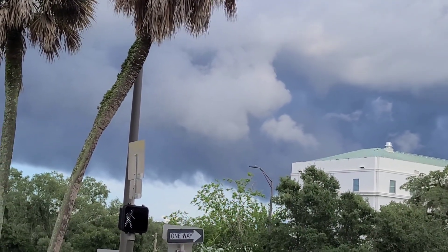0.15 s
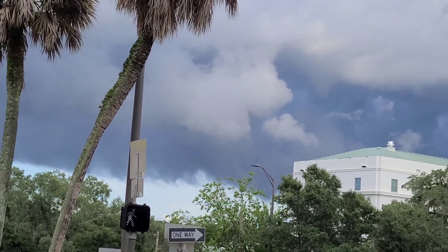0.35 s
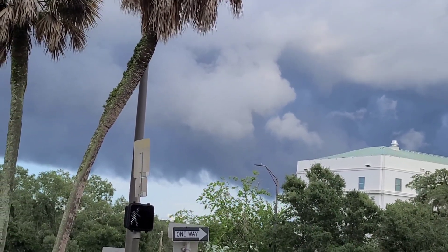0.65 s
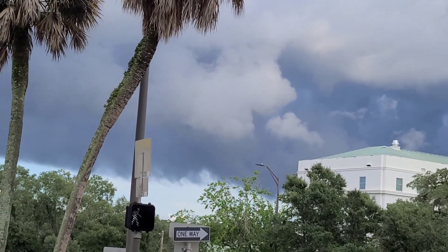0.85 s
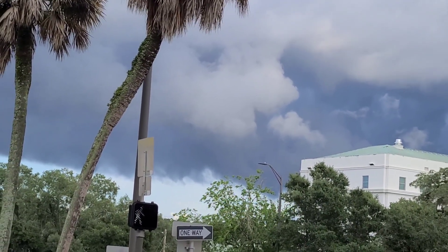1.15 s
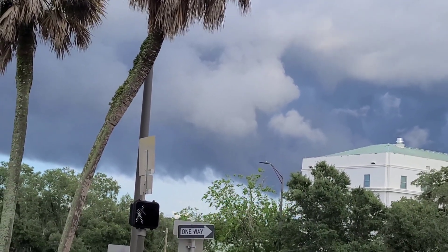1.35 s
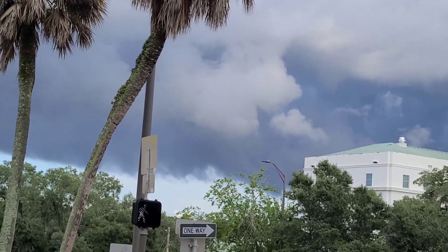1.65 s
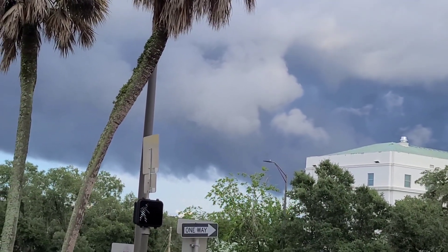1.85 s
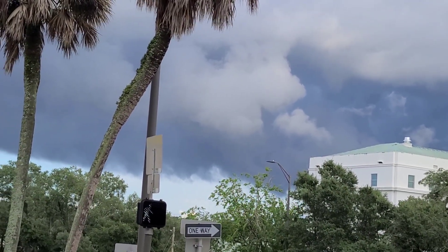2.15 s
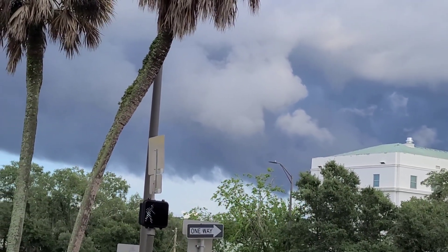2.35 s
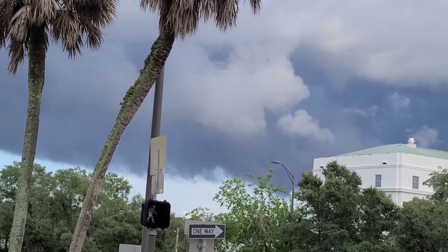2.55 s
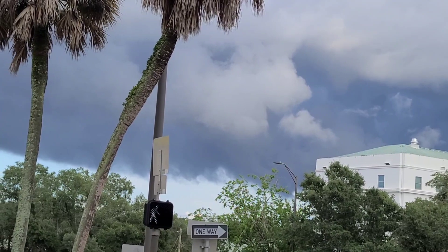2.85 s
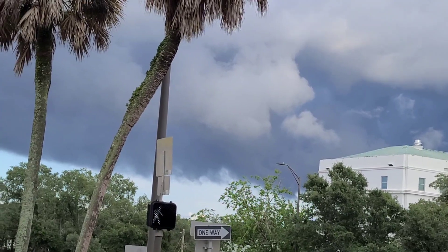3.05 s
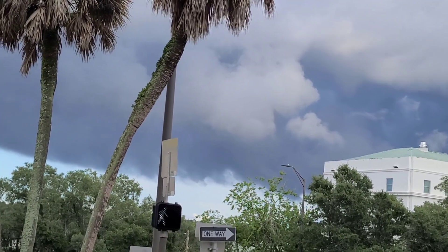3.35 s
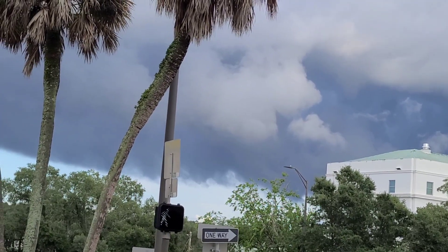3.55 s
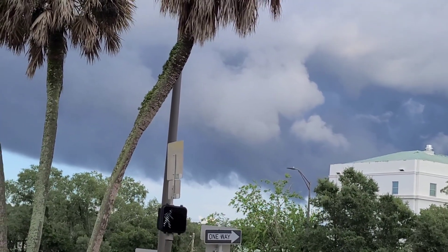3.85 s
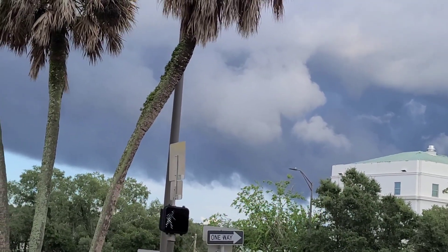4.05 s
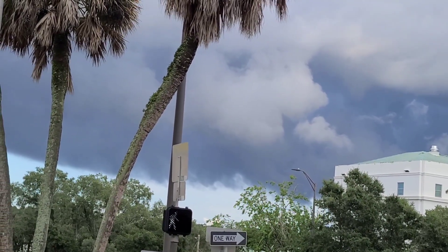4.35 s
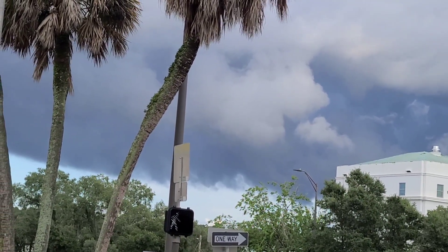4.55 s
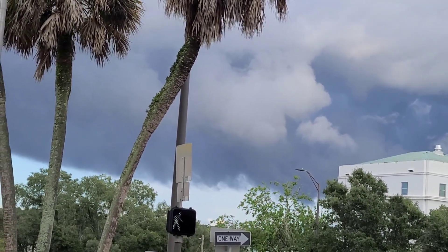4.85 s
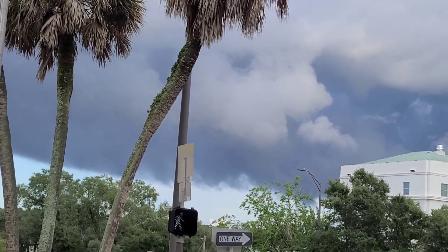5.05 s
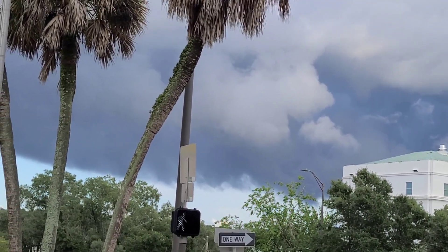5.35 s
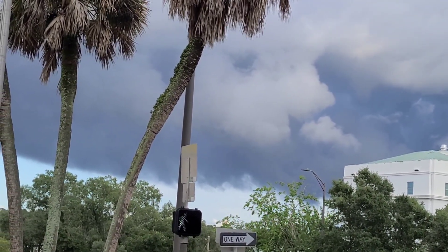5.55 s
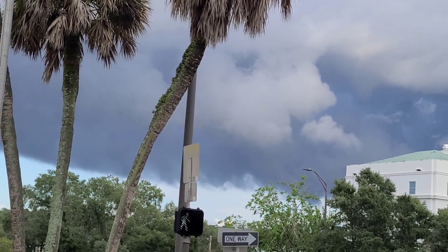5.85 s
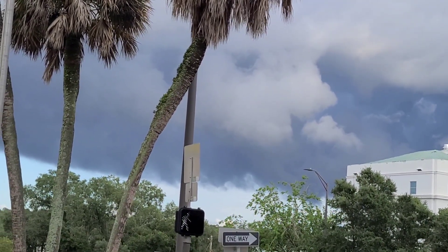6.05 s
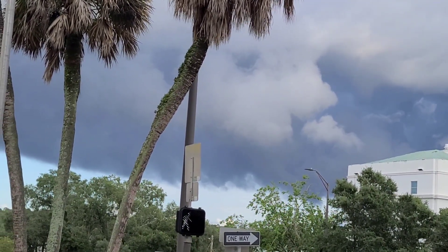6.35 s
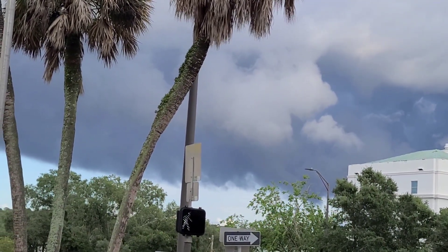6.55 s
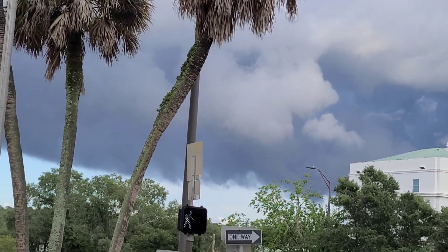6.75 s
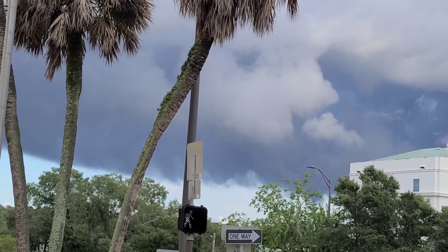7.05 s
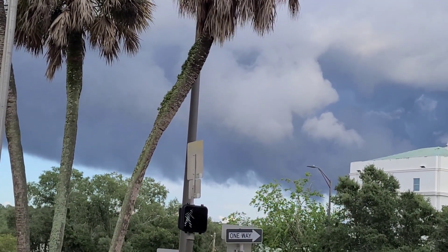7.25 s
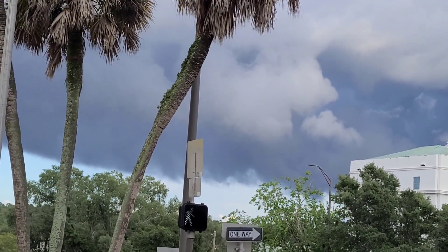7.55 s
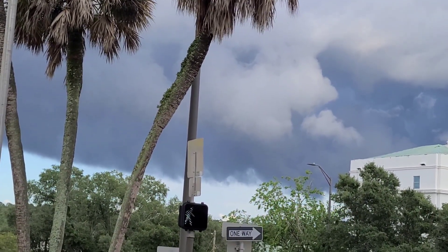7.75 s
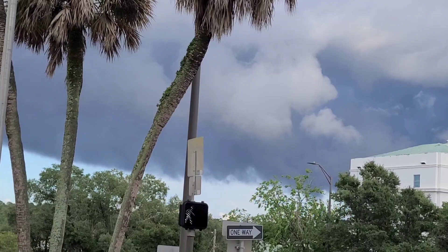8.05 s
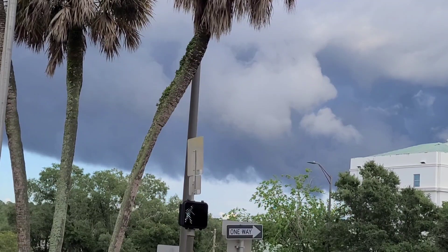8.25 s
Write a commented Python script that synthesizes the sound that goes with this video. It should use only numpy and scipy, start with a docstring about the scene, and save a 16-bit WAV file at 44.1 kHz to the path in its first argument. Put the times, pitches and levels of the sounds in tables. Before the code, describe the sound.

An open city crossing heard from the pavement through a small stereo microphone. Low, steady traffic rumble, a faint airy wash and the low hum of a nearby idling car run throughout. From about 2 s a V8 grows out of the background, its deep burble rising and surging, with a fuzzy engine growl beneath it around 3 s. Dry scratchy ticks fall near 2.7 s and sharper clacks near 4 s. The pitch sags at a gear change around 3.5 s, climbs again, then drops near 5.2 s. Tyre roar and tread hum swell; around 5.8 s the exhaust barks past, raspy, lumpy and slightly left, with light echoes off building fronts. It eases down in pitch and fades strongly by 7.7 s. Tyre noise lingers and swells again while another car pulls away with a rising growl from 7.6 s, and thin, very faint high brake squeals appear until the end near 8.4 s.

```python
"""A city crossing, heard from the pavement on a small two-port microphone.
All the while, filtered noise makes the distant traffic and a few steady notes make a car idling nearby.
A V8 pulls up the street and changes gear, its exhaust built from many multiples of one engine rate.
A fuzzy growl lies under it near 3 seconds, and short scratchy contacts tick near 2.7 and 4. Tyre noise swells.
The V8 goes by near 5.8 seconds and eases off; late on, a car pulls away and a brake sings faintly."""
import sys
import numpy as np
from scipy import signal
from scipy.fft import rfft, irfft, next_fast_len
from scipy.io import wavfile
from scipy.ndimage import uniform_filter1d

SR = 44100
rng = np.random.default_rng(int(sys.argv[2]) if len(sys.argv) > 2 else 0)


def digitize_waveform(pressure):
    """Quantize a signal to 16-bit integers and store it at the path in sys.argv[1].

    Rows of a 2-D input are taken as channels; values are limited to [-1, 1].
    """
    field = np.atleast_2d(pressure).T
    bounded = np.clip(field, -1, 1)
    quanta = np.round(bounded * 32767).astype(np.int16)
    wavfile.write(sys.argv[1], SR, quanta)


N = 370881  # length in samples
TIME = np.arange(N) / SR  # seconds

# Spectra of the noises, from distant rumble to exhaust rasp.
# Each row: frequency in [Hz], relative level in [dB per Hz].
RUMBLE_SPECTRUM = [(10, -37), (22, -21.5), (33, 4), (50, -1.5), (78, -4), (100, -9.5), (125, -11),
                   (175, -9.5), (240, -11.5), (330, -21.5), (500, -23.5), (620, -25), (760, -22.5),
                   (950, -51), (1500, -120)]
WASH_SPECTRUM = [(500, -34), (780, -8), (900, -8), (1100, -5), (1350, -0.5), (1520, 2), (1900, -3),
                 (2200, -5.5), (2700, -12.5), (4000, -18), (7300, -32.5), (8800, -44), (10400, -27.5),
                 (12500, -54)]
TYRE_SPECTRUM = [(400, -25), (730, 0.5), (900, -1), (1080, 2), (1280, -2), (1600, 1.5), (1880, -14.5),
                 (2170, -9.5), (2560, -11.5), (3100, -17), (4200, -25.5), (7000, -54), (12000, -81.5)]
HISS_SPECTRUM = [(1800, -9), (3800, -2.5), (5500, -5), (7500, -12), (8300, -10), (8800, -5.5), (9500, -13),
                 (11200, -14.5), (12500, -26), (14000, -35.5)]
PUFF_SPECTRUM = [(40, -43), (120, -11.5), (200, -4.5), (280, -4.5), (360, -5), (600, -42.5), (1500, -120)]
RASP_SPECTRUM = [(200, -32), (350, -3.5), (410, -3), (500, 3), (600, -9.5), (730, -3), (900, -22),
                 (1550, -28), (2550, -39), (3050, -27), (3700, -48.5), (9000, -100)]

# How alike the noise is at left and right. Each row: frequency in [Hz], coherence from 0 to 1.
LEFT_RIGHT_LIKENESS = [(60, 0.96), (180, 0.88), (300, 0.99), (520, 0.7), (890, 0.25), (1500, 0.034),
                       (2600, 0.07)]
# Part of the otherwise unrelated noise comes straight from the left, reaching that port first.
DIRECT_SHARE, PORT_LEAD_S = 0.21, .00052
# Colour of the two ports. Each row: frequency in [Hz], left minus right in [dB].
PORT_COLOUR = [(60, 1), (160, 1.5), (300, 2), (600, 2), (850, -2.5), (1130, 0.5), (1450, -5), (2000, -4.5),
               (2500, -1), (3100, -5), (4400, -4.5), (6500, 1), (8000, -5.5), (9500, 3.5), (12000, -5.5)]
EDGE_HZ = 13600  # upper limit of the sound

# Steady notes of the idling car. Each row: frequency in [Hz], level in [dB].
IDLE_NOTES = [(28.8, -48.5), (43.1, -30.5), (57.6, -41.5), (72, -38.5), (86.3, -34), (115, -44.5),
              (157.6, -36)]

# Engine growls: a fuzzy one under the V8 near 3 s, then a car pulling away late.
# Each row: start in [s], length in [s], crank turns per second at the start in [Hz], level in [dB].
GROWLS = [(2.62, 1.3, 40, -38), (7.583, 1.4, 35.5, -26)]
# What the growls are made of. Each row: multiple of the crank rate [no unit], relative level in [dB].
GROWL_NOTES = [(3, -0.5), (4, 2), (5, -2.5), (6, 2), (6.5, -2.5), (7, 4), (8, 4.5), (8.5, -1.5), (9, 2),
               (10, -4.5)]
# The higher notes of the growls are muffled. Each row: frequency in [Hz], gain in [dB].
GROWL_MUFFLING = [(345, -2.5), (410, -17)]
REV_PER_S, REV_SPAN = 9, 5.6  # crank turns per s gained each second, and in all
REV_ATTACK_S, REV_RELEASE_S = 0.36, 0.26  # swell and fade

# Swells of tyre noise as cars go by; the one at 5.85 s belongs to the V8's pass. # Each row: peak at [s], time
# scale of the swell in [s], roar at the peak in [dB], hiss at the peak in [dB].
TYRE_SWELLS = [(-.2, 0.55, -45.5, -59), (5.15, 0.42, -39, -53), (5.85, 0.25, -34.5, -50.5),
               (7.1, .65, -35, -59.5), (8.45, .4, -37, -57.5)]
FAR_ROAR_DB, FAR_HISS_DB = -47, -67.5  # steady traffic behind them
HISS_FALL = 0.99  # the hiss follows the swell to this power
# Howl of the tyre tread. Each row: time in [s], pitch in [Hz], level in [dB].
TREAD_HOWL = [(2.4, 772, -66), (3.1, 777.3, -45.5), (4.2, 765.4, -49), (5.3, 819.3, -38.5), (5.7, 770, -39),
              (6.45, 728, -39.5), (6.75, 727, -32), (7.2, 751, -37), (7.7, 767, -60)]
# A narrow band of tyre roar sings and climbs as the V8 draws level.
# Each row: time in [s], pitch in [Hz], level in [dB].
TYRE_SING = [(4.85, 1036, -68), (5.06, 1061, -36.5), (5.27, 1182, -48), (5.55, 1360, -45),
             (5.92, 1552, -38.5), (6.3, 1688, -45.5), (6.45, 1715, -68)]
PATCHY_DB = 2.1  # unevenness of the tyre roar and the exhaust rasp

# Faint high whine of the passing V8. Each row: time in [s], level in [dB].
BRAKE_WHINE = [(3.7, -99), (4.1, -68.5), (5.4, -74), (6.15, -61.5), (6.7, -70.5), (7.1, -94)]
# Brake squeals. Each row: middle in [s], half-length in [s], level in [dB].
BRAKE_SQUEALS = [(7.5, .1, -68.5), (7.826, 0.098, -63.5), (8.38, 0.079, -62)]

# Small contacts that tick or clack.
# Each row: time in [s], level in [dB], decay constant of the contact in [s], strongest near [Hz].
TICKS = [(2.7425, -24.5, .0005, 2400), (2.7435, -23, .0008, 1150), (2.7722, -33, .0004, 2250),
         (3.9686, -20, .001, 2550), (3.9728, -23, .0014, 2200), (3.9756, -20, .002, 1370)]
# What the ticks ring with. Each row: pitch in [Hz], relative level in [dB], time to fall by 60 dB in [s].
TICK_MODES = [(1130, -6, 0.014), (1380, -3.5, 0.05), (1890, -6, .016), (2330, -4.5, 0.01),
              (2760, -6, 0.022), (3300, -14, .004), (8550, -5, .0022)]
TICK_FALL_DB = 21.5  # modes an octave or more from the strongest are this much weaker

# The house fronts throw back the sound of the V8 and the ticks.
ECHO_DELAY_S, ECHO_T60_S, ECHO_DB = .02, 1.0, -12.5

# The V8 speeds up in each gear and drops at each change. Each row: time in [s], engine cycles per second in [Hz].
V8_SPEED = [(0, 15.88), (2.0, 18.45), (3.3, 20.42), (3.44, 20.1), (3.58, 18.75), (3.78, 18.12),
            (4.1, 18.22), (5.0, 19.15), (5.24, 17.31), (6.25, 17.2), (6.6, 17.95), (6.88, 15.5),
            (7.15, 14.95), (7.5, 15.6), (8.0, 14.38), (8.41, 14.62)]
# Its exhaust nears, passes and eases off. Each row: time in [s], overall gain in [dB].
V8_LOUDNESS = [(0, -57.5), (1.9, -46.5), (2.3, -40.5), (3.3, -33), (3.95, -32), (4.55, -27), (5.1, -24),
               (5.6, -27), (6.35, -26), (6.8, -26), (7.45, -28.5), (7.68, -36.5), (8.0, -37), (8.41, -37.5)]
# Leading exhaust notes.
# Each entry: multiple of the cycle rate, then relative level in [dB] and share of a surge that it follows.
LEADING_NOTES = {5: (-7.5, 0), 8: (2.77, 0.98), 9: (-1.1, 0.19), 11: (7.43, -0.43), 13: (-1, 0),
                 14: (-10.5, -1.2), 16: (-7.5, 0.31)}
# The pipe favours some pitches of those notes. Each row: frequency in [Hz], gain in [dB].
PIPE_COLOUR = [(72, 2.5), (86, -6), (122, -17.5), (138, 1), (150, 0), (170, 0.5), (195, 0.5), (225, -5.5),
               (285, -11), (305, 0), (322, 8)]
# Surges of the firing note. Each row: middle in [s], half-length in [s], lift in [dB].
FIRING_SURGES = [(2.19, 0.082, 22.5), (2.55, 0.2, 10), (2.96, 0.2, 10.5), (3.575, 0.11, 11.5),
                 (4.18, 0.11, 10.5), (4.66, 0.17, 4.5), (4.97, 0.26, 10), (6.12, 0.29, 5), (6.56, 0.39, 9)]
# Single leading notes swell and cancel as the car moves among its echoes; the deep boom of the fifth multiple
# near 6.4 s comes as the tailpipe faces the pavement. # Each entry: multiple of the cycle rate, then rows of
# middle in [s], half-length in [s], lift in [dB].
NOTE_SWELLS = {5: [(6.36, 0.22, 22.5)], 8: [(2.37, 0.048, 8), (3.42, 0.041, -9), (4.35, 0.093, -6),
               (5.65, 0.25, 4)], 11: [(2.65, 0.94, -6), (4.03, 0.087, -16.5), (5.13, .08, -3.5),
               (5.42, 0.27, 3.5), (6.24, 0.048, -23.5), (6.72, 0.21, 4.5), (8.0, 0.063, 6)],
               13: [(5.05, 0.16, 7.5), (6.97, 0.086, 7.5)], 14: [(5.4, 0.38, 12)], 16: [(2.68, 0.1, 3),
               (5.12, 0.088, 10.5)]}
# The rest of the exhaust note. Each entry: multiple of the cycle rate, relative level in [dB].
OTHER_NOTES = {7: -10, 10: 0.93, 12: 0.75, 15: -2.3, 17: -2, 18: -4.5, 19: -1.5, 20: -0.91, 21: 1.9, 22: 0,
               23: 3.7, 24: -2.7, 25: 1, 26: -10.5, 28: 0, 29: -3, 30: -2.4, 31: -1.5, 41: -6.5, 42: -6.5,
               44: -7, 47: -5}
# The burble rises or dips for a moment. Each row: middle in [s], half-length in [s], lift in [dB].
BURBLE_BUMPS = [(3.25, .3, 0.5), (4.68, 0.14, -4.5), (5.05, 0.12, 1.5), (6.44, 0.23, -6.5)]
# Tailpipe resonances colour the bark. Each row: frequency in [Hz], gain in [dB].
TAILPIPE_COLOUR = [(300, -7.5), (360, -4.5), (400, -1), (450, 0.5), (490, 1), (530, -1), (600, -7.5),
                   (725, -3), (850, -11)]
# The strongest region of the bark climbs during the pass. Each row: time in [s], centre in [Hz].
BARK_FOCUS = [(5.0, 372), (5.8, 400), (6.1, 475), (6.9, 489)]
FOCUS_DB, FOCUS_WIDTH_HZ = 7, 51
# The bark flares as the tailpipe goes by, drops away and briefly returns.
# Each row: middle in [s], half-length in [s], lift in [dB].
BARK_BEAM = [(5.75, 0.29, 10), (6.1, 0.12, 10.5), (6.42, 0.046, -8.5), (6.77, 0.17, 4)]
BARK_DB = -7


def amp(db):
    """Turns decibels into a gain."""
    return 10 ** (np.asarray(db) / 20)


def unit(x):
    """Scales to an average strength (rms) of 1."""
    return x / np.sqrt(np.mean(abs(x) ** 2) + 1e-20)


def curves(rows):
    """Turns each column of a table into a curve over time."""
    seconds, *columns = np.transpose(rows)
    return [np.interp(TIME, seconds, column) for column in columns]


def at_hz(points, hz):
    """Reads a spectrum on a log-frequency axis."""
    f, value = np.transpose(points)
    return np.interp(np.log(hz + 1), np.log(f + 1), value)


def bell(middle_s, half_s):
    """A smooth rise to 1 and fall."""
    return np.exp(-((TIME - middle_s) / half_s) ** 2)


def bumps(rows):
    """Adds up bell-shaped lifts in dB over time."""
    return sum(db * bell(middle_s, half_s) for middle_s, half_s, db in rows)


def swell_shape(peak_s, scale_s):
    """A rise to 1 and fall, with the long skirts of a sound that weakens with distance."""
    return 1 / np.hypot(1, (TIME - peak_s) / scale_s)


def drift(rate_hz):
    """Slow random wandering of rms 1, with little above the given rate."""
    slow_rate, count = 400, 4096
    f = np.fft.rfftfreq(count, 1 / slow_rate)
    slow = irfft(rfft(rng.standard_normal(count)) / (1 + (f / rate_hz) ** 4))
    return np.interp(TIME, np.arange(len(slow)) / slow_rate, unit(slow))


def noise(spectrum, patchy_db, size=2048):
    """Two-port noise of rms 1: random spectra in short overlapping frames, with drifting patches."""
    hz = np.fft.rfftfreq(size, 1 / SR)
    hop = size // 4
    a, b, c, d, patches = rng.standard_normal((5, N // hop + 5, len(hz)), dtype=np.float32)
    patches = uniform_filter1d(patches, size=9, axis=0)  # smooth over time
    patches = unit(uniform_filter1d(patches, size=14, axis=1))  # and over frequency
    alike = at_hz(LEFT_RIGHT_LIKENESS, hz)
    delay = np.exp(-2j * np.pi * hz * PORT_LEAD_S)
    same = alike + (1 - alike) * DIRECT_SHARE * delay
    own = np.sqrt(np.maximum(1 - abs(same) ** 2, 0))
    left = a + 1j * b
    right = same * left + own * (c + 1j * d)
    frames = np.array([left, right]) * amp(at_hz(spectrum, hz) + patchy_db * patches)
    sound = signal.istft(frames.transpose(0, 2, 1), nperseg=size, noverlap=size - hop)[1]
    return unit(sound[:, :N])


def partial(turns, scatter, rate, spread=0):
    """One note near rms 1: direct sound plus wavering street reflections, shifted between the ports."""
    port_shift = spread * drift(4) * np.array([[1], [-1]])
    angle = 2 * np.pi * (turns + rng.random()) + port_shift
    angle = (angle % (2 * np.pi)).astype(np.float32)
    in_step = (1 + scatter * drift(rate)) * np.cos(angle)
    out_of_step = scatter * drift(rate) * np.sin(angle)
    return (in_step + out_of_step) / np.sqrt(.5 + scatter ** 2)


def street():
    """Distant traffic: low rumble and tyre wash, both shaped noise."""
    rumble = amp(-27.0) * noise(RUMBLE_SPECTRUM, patchy_db=1.5)
    wash = amp(-45.0) * noise(WASH_SPECTRUM, patchy_db=1.1)
    return rumble + wash


def idling_car():
    """A four-cylinder engine ticking over, its speed barely wandering."""
    clock = np.cumsum(1 + 0.0029 * drift(2.5)) / SR
    return sum(amp(db) * partial(hz * clock, scatter=.3, rate=5) for hz, db in IDLE_NOTES)


def engine_growls():
    """A fuzzy growl under the V8, then a car pulling away: wavering notes that climb and then hold."""
    crank_hz, level = np.zeros(N), np.zeros(N)
    for start, length, start_hz, db in GROWLS:
        t = TIME - start
        crank_hz = np.where(t > 0, start_hz + np.minimum(REV_PER_S * t, REV_SPAN), crank_hz)
        fade = np.minimum(t / REV_ATTACK_S, (length - t) / REV_RELEASE_S)
        level += amp(db) * np.clip(fade, 0, 1)
    turns = np.cumsum(crank_hz) / SR
    growl = 0
    for k, db in GROWL_NOTES:
        gain = amp(db + at_hz(GROWL_MUFFLING, k * crank_hz))
        growl = growl + gain * partial(k * turns, scatter=.8, rate=13, spread=.14)
    return level * unit(growl)


def tyres():
    """Swelling tyre roar and fine hiss, both shaped noise, with tread howl and a singing band."""
    roar_power, hiss_power = amp(FAR_ROAR_DB) ** 2, amp(FAR_HISS_DB) ** 2
    for peak_s, scale_s, roar_db, hiss_db in TYRE_SWELLS:
        swell = swell_shape(peak_s, scale_s)
        roar_power = roar_power + (amp(roar_db) * swell) ** 2
        hiss_power = hiss_power + (amp(hiss_db) * swell ** HISS_FALL) ** 2
    roar = np.sqrt(roar_power) * noise(TYRE_SPECTRUM, patchy_db=PATCHY_DB)
    hiss = np.sqrt(hiss_power) * noise(HISS_SPECTRUM, patchy_db=2.4)
    # fast, strong wavering turns these two gliding notes into narrow bands
    tread_hz, tread_db = curves(TREAD_HOWL)
    howl = amp(tread_db) * partial(np.cumsum(tread_hz) / SR, scatter=4.1, rate=82, spread=0.46)
    sing_hz, sing_db = curves(TYRE_SING)
    sing = amp(sing_db) * partial(np.cumsum(sing_hz) / SR, scatter=4, rate=56, spread=1.0)
    return howl + sing + roar + hiss


def brake(squeal_hz=9375, whine_hz=8780):
    """A broad, faint whine from the passing car, then a thin, wavering squeal from a brake disc."""
    whine_band = [(7600, -50), (whine_hz - 250, -7), (whine_hz, 0), (whine_hz + 250, -9), (9900, -50)]
    whine = amp(curves(BRAKE_WHINE)[0]) * noise(whine_band, patchy_db=2.5)
    squeal_level = sum(amp(db) * bell(middle_s, half_s) for middle_s, half_s, db in BRAKE_SQUEALS)
    squeal = squeal_level * partial(squeal_hz * TIME, scatter=0.67, rate=35, spread=0.79)
    return whine + squeal


def ticks():
    """Each tick is a short scratchy contact that rings a few small modes, strongest near one pitch."""
    t = np.arange(SR // 8) / SR
    out = np.zeros((2, N))
    for start, db, length, focus_hz in TICKS:
        for hz, mode_db, t60 in TICK_MODES:
            contact = rng.standard_normal((2, len(t))) * t * np.exp(-t / length)
            mode = np.sin(2 * np.pi * hz * t) * amp(-60 * t / t60) * (1 - np.exp(-t * hz))
            ring = signal.fftconvolve(contact, mode[None], axes=1)[:, :len(t)]
            octaves_away = min(abs(np.log2(hz / focus_hz)), 1)
            gain = amp(db + mode_db - TICK_FALL_DB * octaves_away)
            out[:, round(start * SR):][:, :len(t)] += gain * ring / abs(ring).max()
    return out


def v8_drone(turns, cycle_hz):
    """Leading exhaust notes: a surge lifts the firing note at the cost of some burble above it."""
    surge_db, drone = bumps(FIRING_SURGES), 0
    for k, (db, share) in LEADING_NOTES.items():
        swell_db = bumps(NOTE_SWELLS.get(k, []))
        note_db = db + at_hz(PIPE_COLOUR, k * cycle_hz) + share * surge_db + swell_db
        drone = drone + amp(note_db) * partial(k * turns, scatter=0.26, rate=10.7, spread=.03)
    return drone


def v8():
    """Eight firings a cycle; uneven banks fill in the other multiples, and firings puff gas from the pipe."""
    cycle_hz = curves(V8_SPEED)[0]
    turns = np.cumsum(cycle_hz * (1 + .004 * drift(9))) / SR
    # the muffler gives the low multiples; the higher bark beams out of the tailpipe
    body, bark, focus_hz = 0, 0, curves(BARK_FOCUS)[0]
    for k, db in OTHER_NOTES.items():
        if k < 20:
            body = body + amp(db) * partial(k * turns, scatter=.36, rate=3, spread=.05)
        else:
            note_hz = k * cycle_hz
            focus = np.exp(-((note_hz - focus_hz) / FOCUS_WIDTH_HZ) ** 2)
            colour_db = at_hz(TAILPIPE_COLOUR, note_hz) + FOCUS_DB * focus
            bark = bark + amp(db + colour_db) * partial(k * turns, scatter=.28, rate=3, spread=.22)
    # one bank is louder, so the puffs come in three lumps a cycle
    once, lumps, firings = (np.cos(2 * np.pi * k * turns) for k in (1, 3, 8))
    gate = unit(np.exp(.3 * lumps + .25 * once + .2 * firings))
    puffs = gate * noise(PUFF_SPECTRUM, patchy_db=1.0)
    rasp = gate * noise(RASP_SPECTRUM, patchy_db=PATCHY_DB)
    body = amp(-3.5) * unit(body) + amp(-7.5) * puffs
    bark = amp(-2.0) * unit(bark) + amp(-3.5) * rasp
    body = amp(bumps(BURBLE_BUMPS)) * body
    bark = amp(BARK_DB + bumps(BARK_BEAM)) * bark * amp([[1.5], [-1.5]])  # leans to the left
    return amp(curves(V8_LOUDNESS)[0]) * (v8_drone(turns, cycle_hz) + body + bark)


def echoes(x):
    """Adds the sparse, dying reflections of the house fronts, which beat against a gliding note."""
    t = np.arange(SR) / SR
    sparse = rng.standard_normal(SR) * (rng.random(SR) < 1 / 20)
    taps = sparse * (t > ECHO_DELAY_S) * amp(-60 * t / ECHO_T60_S)
    taps = taps[None] / np.linalg.norm(taps)
    return x + amp(ECHO_DB) * signal.oaconvolve(x, taps, axes=1)[:, :N]


def scene():
    """Everything on the street, with echoes on the V8 and the ticks."""
    background = street() + idling_car() + engine_growls() + tyres() + brake()
    return background + echoes(ticks() + v8())


def record(dry):
    """Each port colours the sound in its own way; then a filter removes the highest frequencies."""
    size = next_fast_len(N + 4096)
    tilt_db = at_hz(PORT_COLOUR, np.fft.rfftfreq(size, 1 / SR))
    port_gain = amp(np.array([tilt_db, -tilt_db]) / 2)
    coloured = irfft(rfft(dry, size) * port_gain, size)[:, :N]
    low_pass = signal.firwin(511, EDGE_HZ, window=("kaiser", 9), fs=SR)
    return signal.oaconvolve(coloured, low_pass[None], "same")


dry = scene()
out = record(dry)
digitize_waveform(out)
```